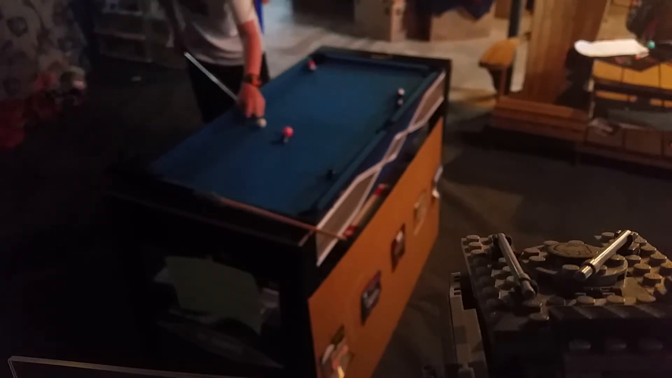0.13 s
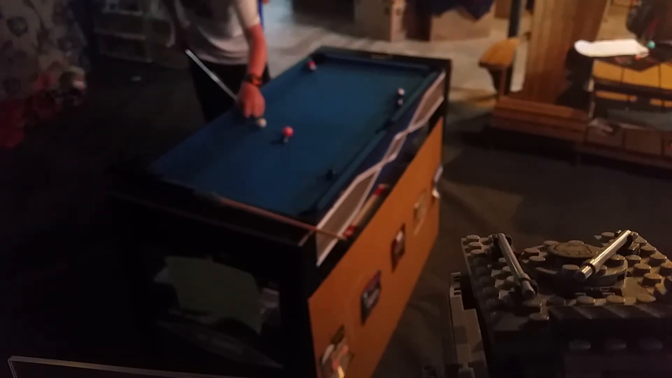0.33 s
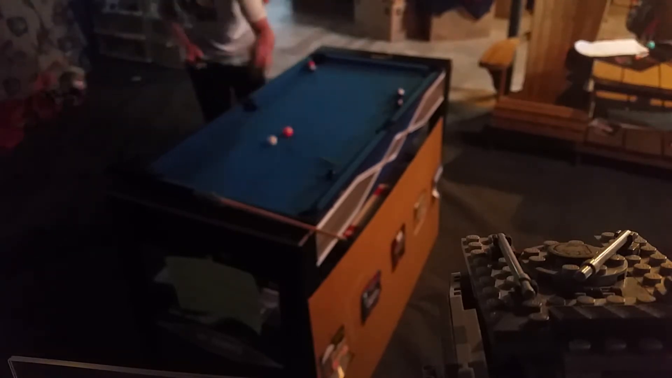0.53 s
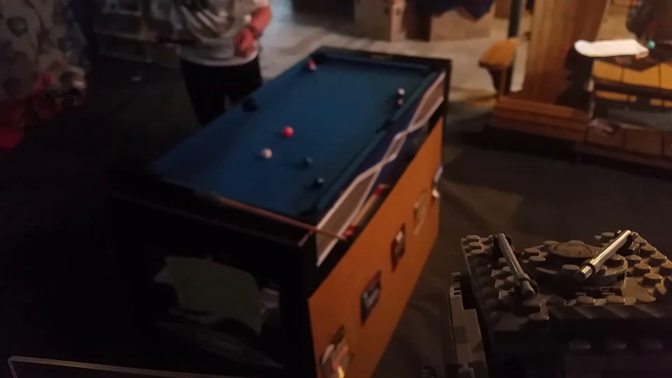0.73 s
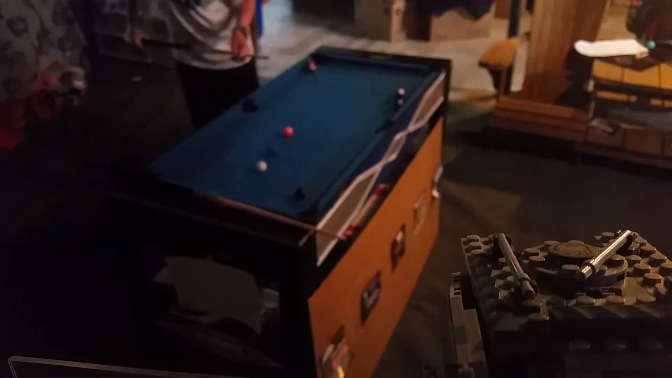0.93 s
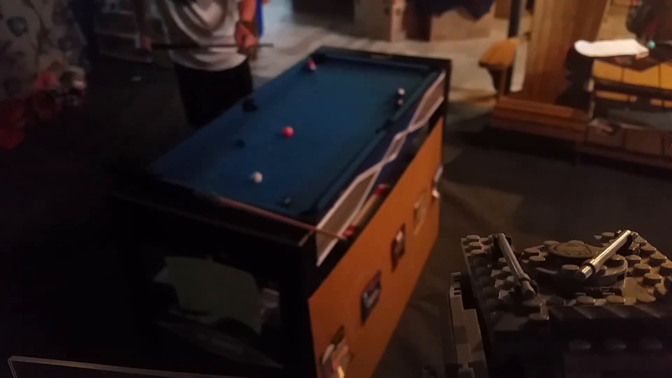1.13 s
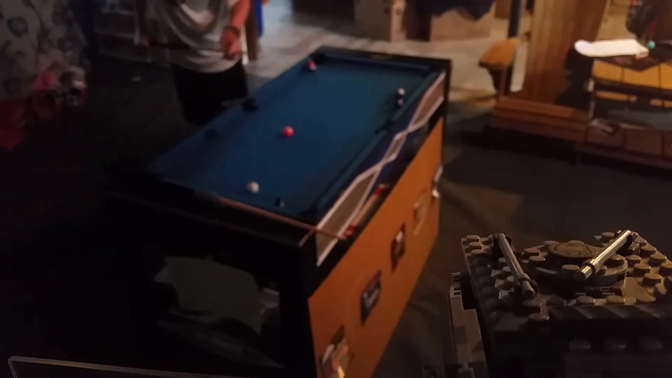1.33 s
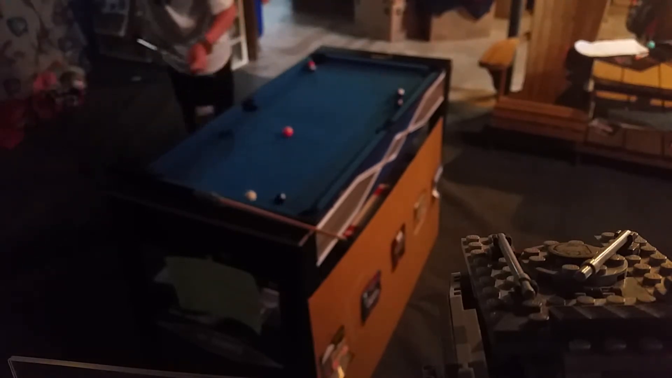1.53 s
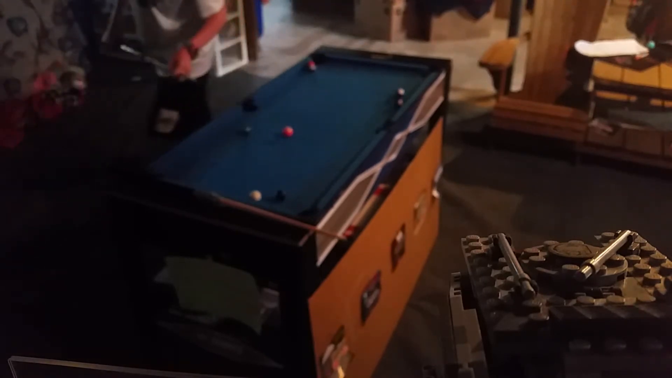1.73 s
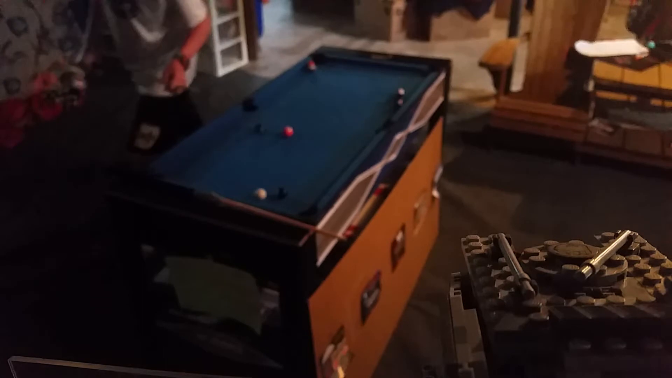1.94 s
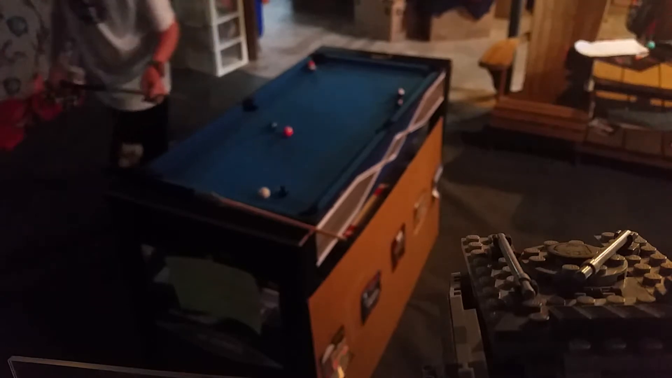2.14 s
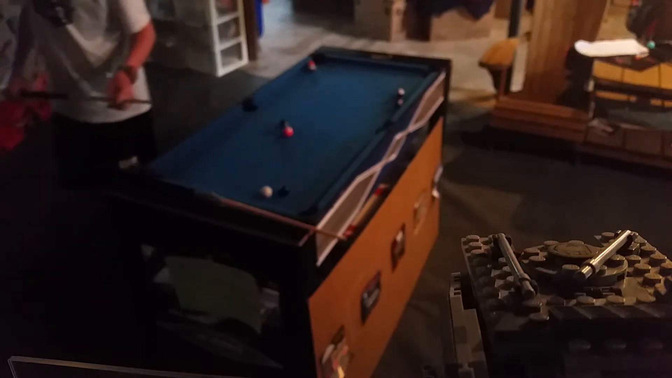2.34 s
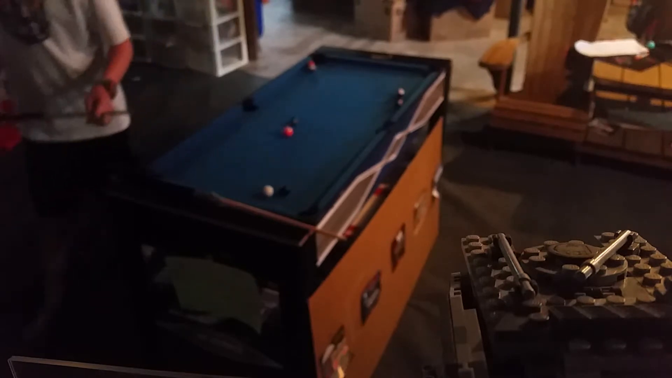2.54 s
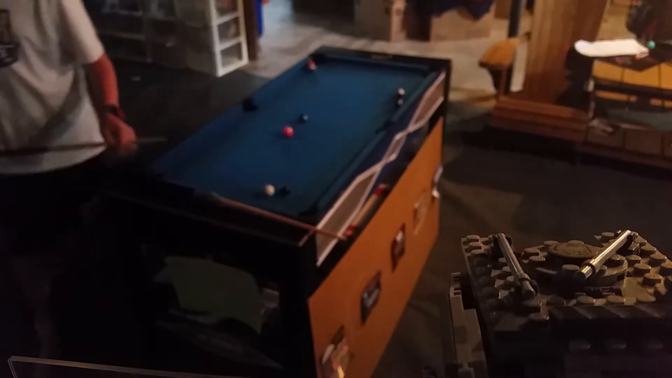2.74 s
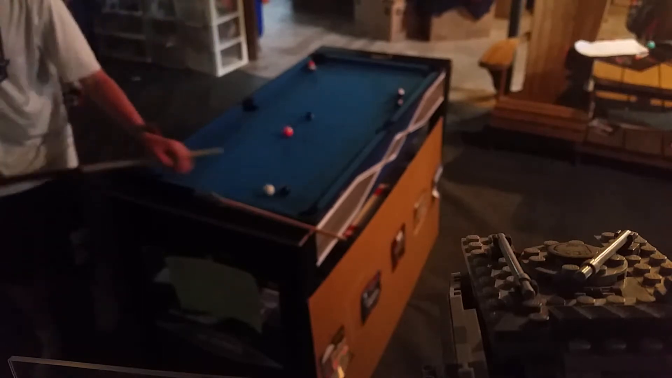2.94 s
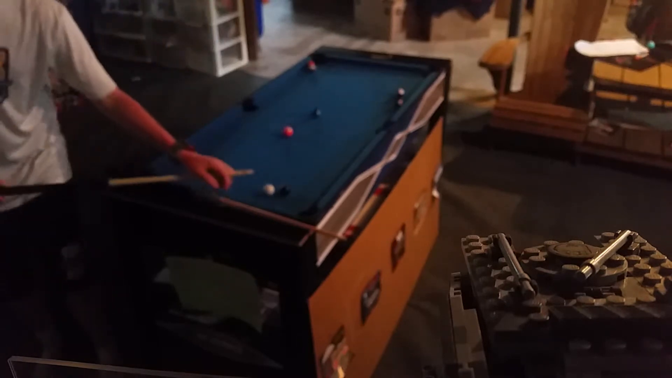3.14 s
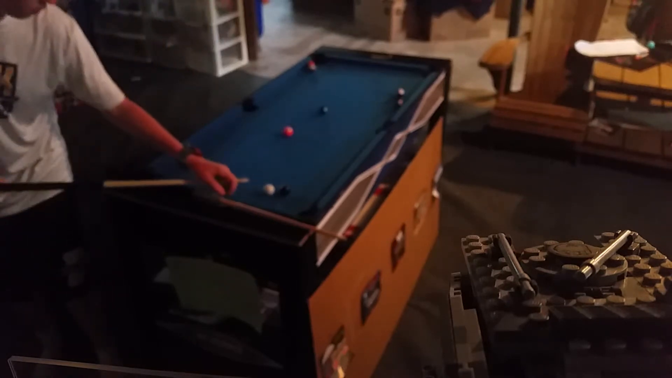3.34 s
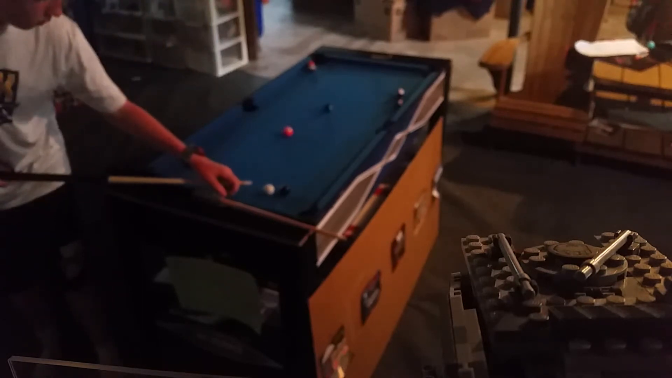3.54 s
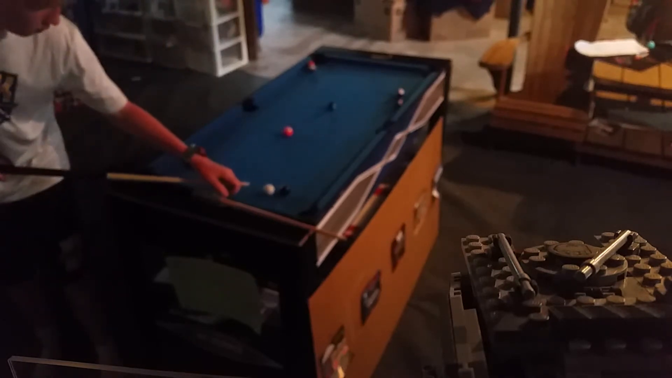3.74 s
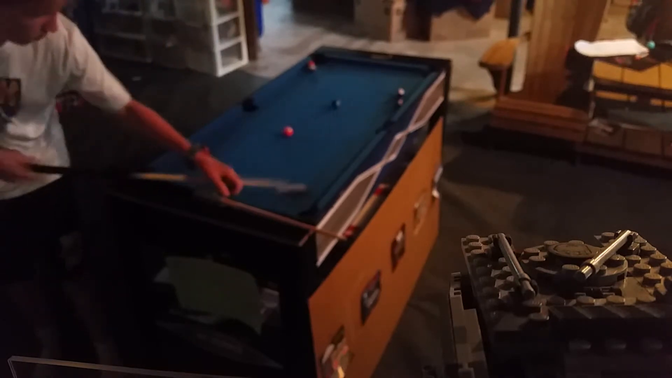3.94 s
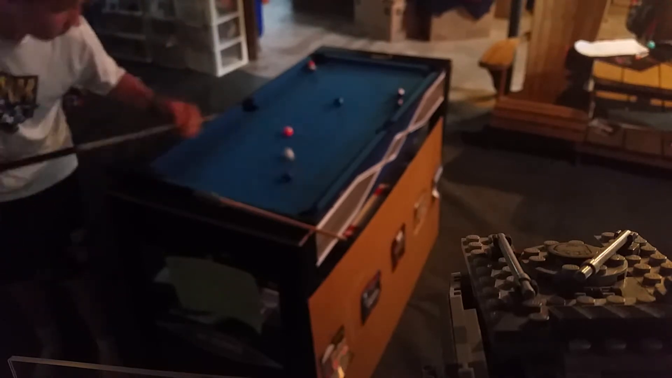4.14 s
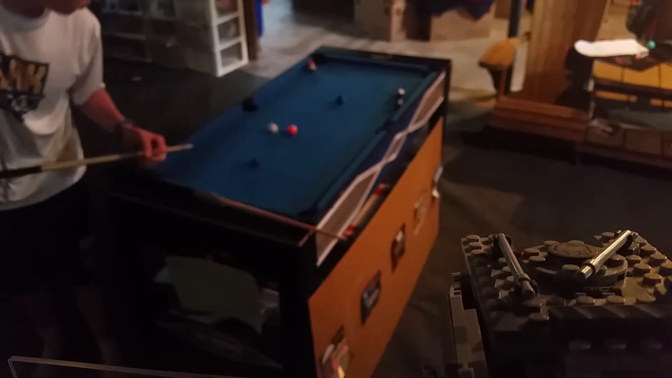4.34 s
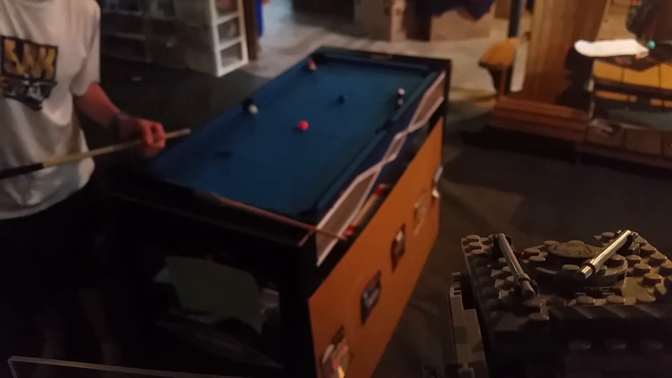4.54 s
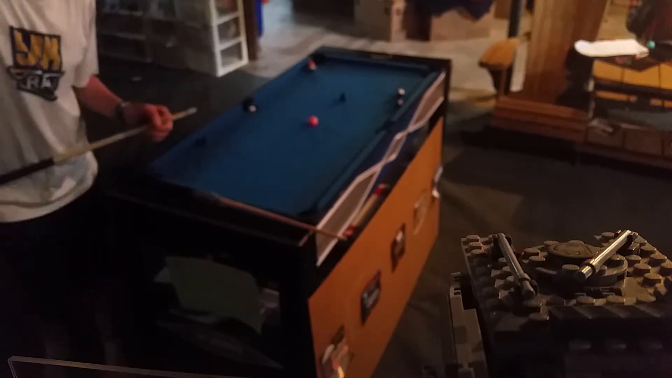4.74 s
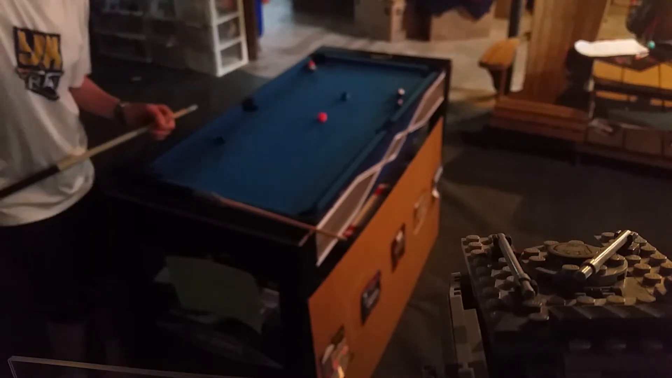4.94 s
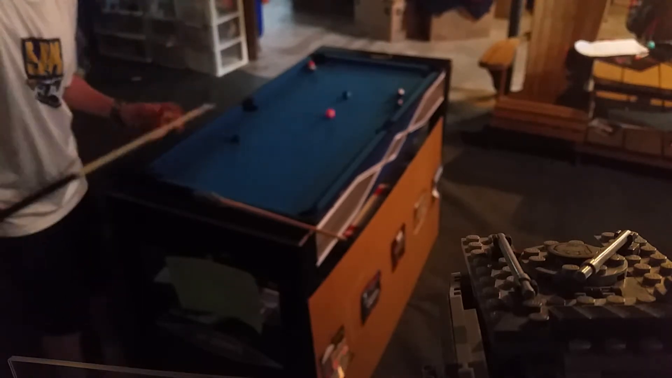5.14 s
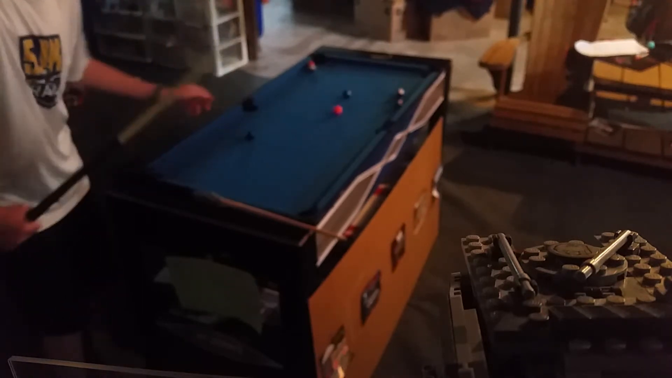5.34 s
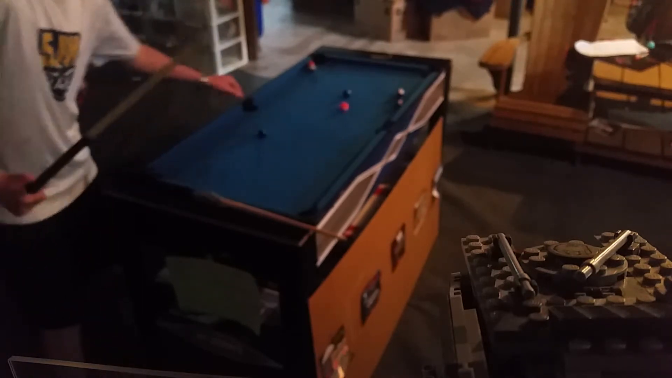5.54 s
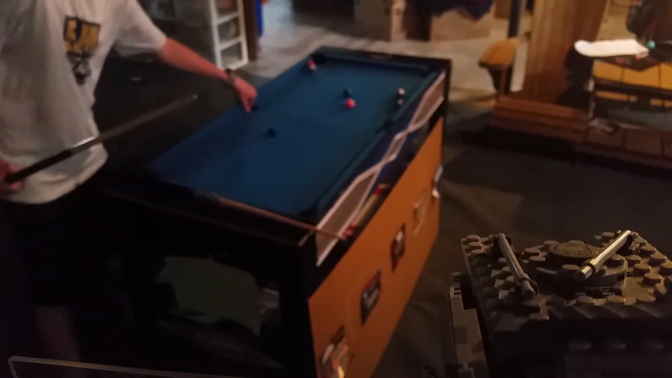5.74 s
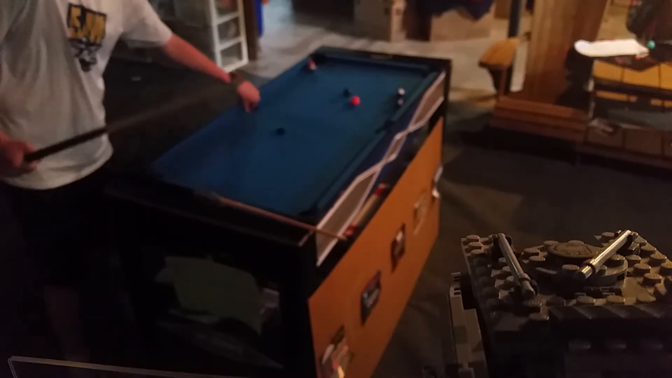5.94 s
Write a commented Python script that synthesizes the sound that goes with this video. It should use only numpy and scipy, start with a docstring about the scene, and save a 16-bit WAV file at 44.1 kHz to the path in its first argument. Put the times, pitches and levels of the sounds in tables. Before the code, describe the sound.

Two shots at pool, with a quiet gap between them. Each starts with a tip knock, hard ball clicks and heavy thumps through the wooden table, with low rolling rumble. The second adds a thin ring of fittings, then a pocket drop and hollow bouncing down the return. Small player movements, low hum, faint hiss and short basement reverberation; the microphone is near the table.

```python
"""Two shots on a small pool table in a basement, over a low two-tone hum, room air and a faint hiss.
First shot: the cue tip knocks, struck wood modes thud, balls clack as short pulses and roll as fading noise.
Then the player shuffles round the table: noise strokes, soft ringing knocks and ticks.
Second shot: tip, thuds, clacks and a thin ring of fittings; a ball drops into a pocket with a dull knock
and rattles down the return inside the cabinet as bouncing, ringing blows. Light knocks and ticks follow."""
import sys
import numpy as np
from scipy import signal
from scipy.fft import rfft, irfft, next_fast_len
from scipy.io import wavfile
from scipy.ndimage import uniform_filter1d

SR = 44100
rng = np.random.default_rng(int(sys.argv[2]) if len(sys.argv) > 2 else 0)


def pcm_store(signal):
    """Save signal as 16-bit PCM."""
    levels = np.round(np.clip(np.atleast_2d(signal), -1, 1) * 32767)
    wavfile.write(sys.argv[1], SR, levels.astype(np.int16).T)


N = 263718
TIME_S = np.arange(N) / SR
AGE_S = TIME_S[:SR * 3 // 4]  # time since a strike

# Cue, bed and cushion blows. Each row: start in seconds, knock in dB, centre of the force in Hz, bed heave in dB.
THUDS = [(.508, -25.5, 340, -32), (.537, -22.5, 280, -40.5), (.562, -27, 210, -20), (.612, -31, 650, -30),
         (.651, -32, 250, -27), (.691, -26, 520, -19), (4.02, -24, 470, -31.5), (4.050, -31, 600, -24),
         (4.081, -31, 900, -19.5), (4.139, -20.5, 330, -28), (4.158, -31, 800, -26)]
# Ball against ball. Each row: start in seconds, level in dB, brightness in Hz, room share in dB.
CLACKS = [(0.5591, -36.5, 9600, 6.5), (0.702, -40.5, 5050, 0), (4.0257, -47, 7970, 12),
          (4.078, -42, 6980, 6.5), (4.394, -52, 5000, 2.5)]
# Tip on cue ball. Each row: start in seconds, level in dB, rasp T60 in seconds, centre of the force in Hz.
STROKES = [(0.5094, -46, 0.058, 1299), (4.0198, -49.5, 0.053, 1500), (4.027, -44, 0.146, 6000)]
# Ball on the return. Each row: start in seconds, level in dB, bounce gap in seconds, boom in dB.
LANDINGS = [(4.7618, -35.5, .015, -0.5), (4.851, -38, .016, 1), (4.930, -37.5, .01, -10),
            (4.952, -31.5, .022, -2)]
# Rolling balls. Each row: start in seconds, level in dB, slowing in dB per second, cloth hiss in dB.
ROLLS = [(.56, -47.5, 13.5, -19.5), (4.08, -45.5, 21.5, -22.5), (4.93, -47.5, 39, -25.5)]
# Knocks as the player moves and leans. Each row: start in seconds, level in dB, overtones in dB.
KNOCKS = [(2.345, -56.5, -11), (3.512, -64, -35), (3.702, -55, -32), (5.812, -52, -35)]
# Small dry ticks. Each row: start in seconds, level in dB, pitch in Hz.
TICKS = [(3.361, -59, 1342), (5.45, -69, 1610), (5.724, -68, 744)]
# Shoes and clothes. Each row: middle in seconds, Gaussian width (sigma) in seconds, level in dB,
# fine hiss in dB, squeak in Hz, squeak in dB.
SCUFFS = [(1.313, 0.032, -65.5, -77.5, 1533, -66), (1.471, 0.048, -56, -75, 1140, -71.5),
          (3.169, 0.041, -71.5, -73, 2010, -82)]
# Level of the upper hum tone. Each row: time in seconds, level in dB.
UPPER_HUM = [(0, -56), (.4, -63), (.85, -48.5), (1.5, -51), (1.8, -58.5), (2.5, -54), (3.1, -55),
             (3.8, -66), (5.98, -65.5)]

# Modes of the bed and cabinet. Each row: frequency in Hz, level in dB, T60 in seconds.
TABLE_MODES = [(120, -11, .15), (143, 1, .24), (166, -6, .15), (192, -3, .16), (242, -1, .21),
               (277, -4, .2), (345, -6, .2), (420, -6, .2), (539, -7, .23), (616, -7, .23), (660, -9, .18),
               (752, -13, .18), (930, -15, .16)]
# Deep boom under each heave. Each row: frequency in Hz, level in dB, T60 in seconds.
BOOM_MODES = [(66, 0, .35), (92, 2, .3)]
# Modes of the table's fittings. Each row: frequency in Hz, level in dB, T60 in seconds.
FITTING_MODES = [(3047, -5, .15), (3892, -1, .3), (4134, -4, .23), (4624, 0, .33), (5405, -6, .27)]
# Modes of the pocket and ball return. Each row: frequency in Hz, level in dB, T60 in seconds.
CHUTE_MODES = [(339, 7, 0.064), (395, -1, 0.047), (533, -17, 0.056), (635, 2.5, 0.045), (734, 5.5, 0.032),
               (752, 1.5, 0.071), (1130, -22, 0.047), (1503, -12, 0.084), (1690, -10.5, 0.12),
               (1765, -6.5, 0.044), (1788, -5.5, 0.043), (1820, -4, 0.044), (2085, -16.5, 0.053),
               (3560, -14.5, 0.065)]
# Modes of the hollow cabinet under the return. Each row: frequency in Hz, level in dB, T60 in seconds.
CABINET_MODES = [(89.5, -13, 0.13), (106.3, -1, 0.27), (141.4, -4, 0.17), (185.4, -1.5, .2),
                 (222, -5, 0.19)]
# Overtones of the player's knocks. Each row: frequency in Hz, level in dB, T60 in seconds.
KNOCK_OVERTONES = [(1057, 0, .25), (1905, -3, .33)]

# Spectrum of the wooden panels. Each row: frequency in Hz, relative level in dB.
WOOD_SPECTRUM = [(40, -8.5), (100, -7.5), (160, 8), (350, -0.5), (700, -5.5), (1100, -10.5), (1800, -21.5),
                 (4000, -23), (7500, -36), (15000, -26)]
# Spectrum of a ball's pulse. Each row: frequency in Hz, relative level in dB.
BALL_SPECTRUM = [(300, -26), (1000, -11.5), (1800, -9), (2700, -2), (3300, -3), (3950, 4), (5400, -3),
                 (6600, -12.5), (10500, -18), (12500, -18.5), (16000, -33)]
# Spectrum of the cue tip. Each row: frequency in Hz, relative level in dB.
TIP_SPECTRUM = [(600, -3.5), (1400, 10.5), (2300, 5), (3500, -10), (5000, -0.5), (6500, -13.5),
                (9000, -7.5), (12000, -2.5), (16000, -7)]
# Spectrum of the padded pocket mouth. Each row: frequency in Hz, relative level in dB.
MOUTH_SPECTRUM = [(100, -10), (220, -2), (330, 6.5), (450, -0.5), (560, 2.5), (700, 5.5), (900, -7.5),
                  (1200, -14.5), (1700, -29.5), (5000, -28.5), (7500, -56.5), (10500, -43.5),
                  (15000, -35.5)]
# Spectrum of dense rattling modes. Each row: frequency in Hz, relative level in dB.
RATTLE_SPECTRUM = [(80, 0), (300, 5.5), (720, 6), (860, -4), (1050, -4), (1300, -12.5), (1750, -11),
                   (2050, -13), (3600, -12), (6200, -18), (7500, -18.5), (15000, -31)]
# Spectrum of the liner's scrape. Each row: frequency in Hz, relative level in dB.
LINER_SPECTRUM = [(1000, -10), (3000, 11.5), (6200, 6), (7400, -13), (8800, -6.5), (10300, 3),
                  (12500, -0.5), (16000, -10)]
# Spectrum of the rolling rumble. Each row: frequency in Hz, relative level in dB.
RUMBLE_SPECTRUM = [(25, -29), (60, 7.5), (130, 1.5), (200, 4), (300, -16), (600, -12.5), (1000, -24),
                   (2500, -30), (4500, -24.5), (8000, -56)]
# Spectrum of the cloth under a ball. Each row: frequency in Hz, relative level in dB.
CLOTH_SPECTRUM = [(500, 1), (1200, -8.5), (2400, -9.5), (3800, 4), (5200, -5), (7000, -31.5), (10500, -9),
                  (16000, -15.5)]
# Spectrum of rubbing soles. Each row: frequency in Hz, relative level in dB.
SOLE_SPECTRUM = [(150, 1), (600, 6), (1500, -7.5), (2400, -2.5), (3100, -8.5), (3700, 9.5), (4800, -3),
                 (6000, -17), (7500, -38), (16000, -29.5)]
# Spectrum of the scuffs' fine hiss. Each row: frequency in Hz, relative level in dB.
GRIT_SPECTRUM = [(1000, -36), (3000, 4), (6200, -18), (7800, -29), (10300, 5), (12500, 1), (16000, -3)]
# Spectrum of room air. Each row: frequency in Hz, relative level in dB.
AIR_SPECTRUM = [(12, -57.5), (20, -34.5), (32, -40.5), (47, -11.5), (76, -14), (109, -10.5), (196, -14.5),
                (477, -32), (507, -34.5), (596, -28.5), (874, -42), (2500, -51.5), (3250, -68),
                (5500, -120)]
# Spectrum of the faint hiss. Each row: frequency in Hz, relative level in dB.
HISS_SPECTRUM = [(1500, -28), (2600, -7), (3250, -26), (3700, -0.5), (4200, -6), (5200, -10), (6000, -36),
                 (8500, -26.5), (13500, -14), (16000, -14)]

# Basement decay. Each row: frequency in Hz, T60 in seconds.
BASEMENT_T60 = [(100, 0.54), (300, 0.27), (700, 0.34), (2000, 0.37), (4500, 0.32), (8000, 0.33),
                (15000, 0.3)]
# Left-right likeness of diffuse sound. Each row: frequency in Hz, correlation from 0 to 1.
LIKENESS = [(100, 1), (250, 0.63), (550, 0.47), (1100, 0), (4000, 0.012)]
# Microphone port colour. Each row: frequency in Hz, left minus right in dB.
PORTS = [(200, 1), (700, -1), (1300, -2), (2400, -1.5), (4400, -9), (6500, -9.5), (9500, 8.5), (15000, 6)]

HEAVE_LAG_S, HEAVE_HZ = .001, 146  # the bed gives under each blow with a slow push
REBOUND_S, REBOUND_LOSS_DB = .024, 5  # and springs back
BOUNCE_LOSS_DB, BOUNCE_DULLING = 4.5, .8  # per bounce: weaker, and force centre lower by this ratio
LANDING_HZ, BOOM_HZ, GRIT_DB = 1770, 120, -13  # force centres on liner and cabinet; liner scrape
KNOCK_HZ, KNOCK_T60_S, KNOCK_RISE_S = 606.8, .38, .005
TICK_T60_S, TICK_BODY_RATIO, TICK_BODY_DB = .08, .59, -5  # each tick has a lower, weaker body tone
ROLL_RISE_S = .059
WHISTLE_HZ, WHISTLE_Q = 3720, 50  # narrow resonance shared by soles, rolling cloth and hiss
TOP_HZ = 15830


def amp(db):
    """Decibels to gain."""
    return 10 ** (np.asarray(db) / 20)


def unit(x):
    """Scale to rms 1."""
    return x / np.sqrt(np.mean(x ** 2) + 1e-20)


def blow(x):
    """Scale a transient to the energy of 10 ms at rms 1."""
    return x * np.sqrt(SR / 100 / np.sum(x ** 2))


def along(points, hz):
    """Interpolate (Hz, value) points on a log frequency axis."""
    point_hz, value = np.transpose(points)
    return np.interp(np.log(hz + 1), np.log(point_hz + 1), value)


def filtered(x, response):
    """Apply a complex frequency response, zero-padded against wraparound."""
    n = x.shape[-1]
    size = next_fast_len(n + SR // 8)
    hz = np.fft.rfftfreq(size, 1 / SR)
    return irfft(rfft(x, size) * response(hz), size)[..., :n]


def coloured(x, spectrum, size=4096):
    """Apply a spectrum as a causal minimum-phase filter, by folding the cepstrum."""
    gain = amp(along(spectrum, np.fft.rfftfreq(size, 1 / SR)))
    cepstrum = irfft(np.log(gain))
    cepstrum[1:size // 2] *= 2
    cepstrum[size // 2 + 1:] = 0
    impulse = irfft(np.exp(rfft(cepstrum)))
    return signal.fftconvolve(x, impulse)[:len(x)]


def diffuse(n):
    """Stereo noise as a room delivers it: alike in the bass, unrelated in the treble."""
    def mid_side_gains(hz):
        turn = np.arccos(np.clip(along(LIKENESS, hz), -1, 1)) / 2
        return np.array([np.cos(turn), np.sin(turn)])

    mid, side = filtered(rng.standard_normal((2, n)), mid_side_gains)
    return np.array([mid + side, mid - side])


def rush(spectrum):
    """Steady diffuse noise of rms 1."""
    return unit(filtered(diffuse(N), lambda hz: amp(along(spectrum, hz))))


def burst(spectrum, t60_s):
    """Many close modes dying together: coloured decaying noise."""
    noise = rng.standard_normal(len(AGE_S)) * amp(-60 * AGE_S / t60_s)
    return blow(coloured(noise, spectrum))


def ring(modes, scatter_db, detune=0):
    """Modes struck at a new spot: new strengths, slightly new pitches if detuned, alternating signs."""
    hz, db, t60_s = np.transpose(modes)[:, :, None]
    strength, shift = rng.standard_normal((2, len(modes), 1))
    sign = (-1) ** np.arange(len(modes))[:, None]
    swing = sign * np.sin(2 * np.pi * hz * (1 + detune * shift) * AGE_S)
    decay = amp(db + scatter_db * strength - 60 * AGE_S / t60_s)
    return blow(np.sum(decay * swing, axis=0))


def contact(x, hz, q):
    """The length of a contact selects a band of the body's response: a resonant band-pass."""
    def band(f):
        damping = 1j * f * hz / q
        return damping / (hz * hz - f * f + damping)

    return blow(filtered(x, band))


def tap(hz, t60_s, tone_db):
    """A light, soft contact: a band of dense modes around one clear tone."""
    dense = contact(contact(burst(RATTLE_SPECTRUM, t60_s), hz, q=1.5), hz, q=1.5)
    return blow(dense + amp(tone_db) * ring([(hz, 0, t60_s)], scatter_db=0))


def whistling(noise, whistle_db):
    """Noise with the narrow whistle standing out of it."""
    return noise + amp(whistle_db) * unit(contact(noise, WHISTLE_HZ, q=WHISTLE_Q))


def in_room(x, room_db, build_s=.012):
    """Direct sound plus the basement's answer: a freshly drawn diffuse tail, treble and bass decaying apart."""
    hz, t, bins = signal.stft(diffuse(len(AGE_S)), SR, nperseg=256)
    decay = amp(-60 * t / along(BASEMENT_T60, hz)[:, None])
    tail = signal.istft(bins * decay, SR)[1][:, :len(AGE_S)]
    tail = tail * (1 - np.exp(-AGE_S / build_s))
    tail = tail / np.linalg.norm(tail[0])
    answer = signal.fftconvolve(np.atleast_2d(x), tail, axes=1)[:, :len(AGE_S)]
    return x + amp(room_db) * answer


def add(track, start_s, x):
    """Mix x into the track, cut at the track's end."""
    part = track[:, round(start_s * SR):][:, :x.shape[-1]]
    part += x[..., :part.shape[1]]


def thuds(dense_db=-2, room_db=-8, heave_ring_db=-7, heave_q=1.3, boom_db=-21):
    """Soft, heavy blows ring the wooden table: a knock and boom, then the bed heaves and springs back."""
    out = np.zeros((2, N))
    for start_s, knock_db, knock_hz, heave_db in THUDS:
        body = ring(TABLE_MODES, scatter_db=4) + amp(dense_db) * burst(WOOD_SPECTRUM, t60_s=.11)
        knock = contact(body, knock_hz, q=.82)
        add(out, start_s, amp(knock_db) * in_room(knock, room_db))
        for k in range(2):  # push, rebound
            body = burst(WOOD_SPECTRUM, t60_s=.11) + amp(heave_ring_db) * ring(TABLE_MODES, scatter_db=4)
            heave = in_room(contact(body, HEAVE_HZ, q=heave_q), room_db)
            add(out, start_s + HEAVE_LAG_S + k * REBOUND_S, amp(heave_db - k * REBOUND_LOSS_DB) * heave)
        add(out, start_s, amp(heave_db + boom_db) * ring(BOOM_MODES, scatter_db=2))
    return out


def clacks(early_db=4, early_t60_s=.022):
    """Hard balls give one very short pulse, scattered at once by the bed and rails, then by the room."""
    out = np.zeros((2, N))
    for start_s, db, bright_hz, room_db in CLACKS:
        def soften(hz):  # second-order low-pass
            return 1 / (1 + 1j * np.sqrt(2) * hz / bright_hz - (hz / bright_hz) ** 2)

        pulse = coloured(signal.unit_impulse(len(AGE_S)), BALL_SPECTRUM)
        pulse = blow(filtered(pulse, soften))
        envelope = np.sqrt(AGE_S) * amp(-60 * AGE_S / early_t60_s)
        paths = rng.standard_normal((2, len(AGE_S))) * envelope
        early = np.array([blow(signal.fftconvolve(pulse, p)[:len(AGE_S)]) for p in paths])
        add(out, start_s, amp(db) * (in_room(pulse, room_db) + amp(early_db) * early))
    return out


def fittings(start_s=4.078, db=-43.5, room_db=-5):
    """The second shot's clack sets off a thin ring of high modes in the table's fittings."""
    out = np.zeros((2, N))
    add(out, start_s, amp(db) * in_room(ring(FITTING_MODES, scatter_db=1.5), room_db))
    return out


def cue(room_db=0):
    """The chalked tip knocks on the cue ball, and rasps across it on the second shot: band-passed bursts."""
    out = np.zeros((2, N))
    for start_s, db, t60_s, hz in STROKES:
        stroke = contact(burst(TIP_SPECTRUM, t60_s), hz, q=.52)
        add(out, start_s, amp(db) * in_room(stroke, room_db))
    return out


def drop(start_s=4.7195, db=-28):
    """The ball hits the padded mouth of the pocket with one dull knock."""
    out = np.zeros((2, N))
    add(out, start_s, amp(db) * in_room(burst(MOUTH_SPECTRUM, t60_s=.075), room_db=2.5))
    return out


def ball_return(dense_db=-1, room_db=-4, count=4):
    """The ball lands and bounces on each stretch of the return; the cabinet booms under it."""
    out = np.zeros((2, N))
    for start_s, db, gap_s, boom_db in LANDINGS:
        for k in range(count):
            hz = LANDING_HZ * BOUNCE_DULLING ** k
            body = ring(CHUTE_MODES, scatter_db=5, detune=.018)
            body = body + amp(dense_db) * burst(RATTLE_SPECTRUM, t60_s=.14)
            knock = contact(contact(body, hz, q=.55), hz, q=.55)  # two passes give the band steeper skirts
            grit = amp(GRIT_DB) * burst(LINER_SPECTRUM, t60_s=.082)
            boom = amp(boom_db) * contact(ring(CABINET_MODES, scatter_db=6.5), BOOM_HZ, q=.93)
            landing = in_room(knock + grit + boom, room_db)
            add(out, start_s + k * gap_s, amp(db - k * BOUNCE_LOSS_DB) * landing)
    return out


def rolling(whistle_db=-7):
    """Rolling balls make the bed rumble and the cloth hiss, fading as they slow."""
    out = np.zeros((2, N))
    rumble = rush(RUMBLE_SPECTRUM)
    cloth = whistling(rush(CLOTH_SPECTRUM), whistle_db)
    for start_s, db, slowing_db_per_s, cloth_db in ROLLS:
        age_s = np.maximum(TIME_S - start_s, 0)
        level = amp(db - slowing_db_per_s * age_s) * (1 - np.exp(-age_s / ROLL_RISE_S))
        out += level * (rumble + amp(cloth_db) * cloth)
    return out


def knocks(tone_db=0, overtone_tone_db=1, room_db=-1.5):
    """The player moves and leans on the table: soft-edged taps with ringing overtones."""
    out = np.zeros((2, N))
    for start_s, db, overtone_db in KNOCKS:
        overtones = sum(amp(level_db) * tap(hz, t60_s, overtone_tone_db)
                        for hz, level_db, t60_s in KNOCK_OVERTONES)
        knock = tap(KNOCK_HZ, KNOCK_T60_S, tone_db) + amp(overtone_db) * overtones
        knock = blow(knock * (1 - np.exp(-AGE_S / KNOCK_RISE_S)))
        add(out, start_s, amp(db) * in_room(knock, room_db))
    return out


def ticks(tone_db=3, room_db=-6):
    """Small dry ticks: a short tap over a lower body tap."""
    out = np.zeros((2, N))
    for start_s, db, hz in TICKS:
        body = tap(hz * TICK_BODY_RATIO, TICK_T60_S, tone_db)
        tick = tap(hz, TICK_T60_S, tone_db) + amp(TICK_BODY_DB) * body
        add(out, start_s, amp(db) * in_room(tick, room_db))
    return out


def scuffs(grain_db=3, whistle_db=-5):
    """Shoes and clothes brush and faintly squeak: rubbing grips and slips, so the noise is grainy."""
    out = np.zeros((2, N))
    catching = amp(grain_db * unit(uniform_filter1d(rng.standard_normal(N), size=200)))
    sole = unit(whistling(catching * rush(SOLE_SPECTRUM), whistle_db))
    fine_hiss = unit(catching * rush(GRIT_SPECTRUM))
    for middle_s, width_s, db, hiss_db, squeak_hz, squeak_db in SCUFFS:
        squeak = unit(contact(sole, squeak_hz, q=40))
        stroke = np.exp(-((TIME_S - middle_s) / width_s) ** 2 / 2)
        out += stroke * (amp(db) * sole + amp(hiss_db) * fine_hiss + amp(squeak_db) * squeak)
    return out


def background(lower_hz=65.5, upper_hz=82.1, lower_db=-57.5, air_db=-60):
    """A steady low sine beats against one of wavering level, over room air."""
    upper_db = np.interp(TIME_S, *np.transpose(UPPER_HUM))
    lower = amp(lower_db) * np.sin(2 * np.pi * lower_hz * TIME_S)
    upper = amp(upper_db) * np.sin(2 * np.pi * upper_hz * TIME_S)
    return np.sqrt(2) * (lower + upper) + amp(air_db) * rush(AIR_SPECTRUM)  # sqrt 2: levels are rms


def hiss(left_db=-87, right_db=-76.5, whistle_db=-11):
    """A faint steady hiss with a narrow whistle in it, mostly on the right."""
    return amp([[left_db], [right_db]]) * whistling(rush(HISS_SPECTRUM), whistle_db)


def scene():
    """The game and the room around it."""
    shots = thuds() + clacks() + fittings() + cue() + rolling()
    potted_ball = drop() + ball_return()
    player = knocks() + ticks() + scuffs()
    return shots + potted_ball + player + background() + hiss()


def record(dry):
    """Each microphone port colours the treble its own way; nothing passes above the band limit."""
    def response(hz):
        tilt_db = np.outer([.5, -.5], along(PORTS, hz))  # half the difference to each side
        return amp(tilt_db) * (hz < TOP_HZ)

    return filtered(dry, response)


dry = scene()
out = record(dry)
pcm_store(out)
```